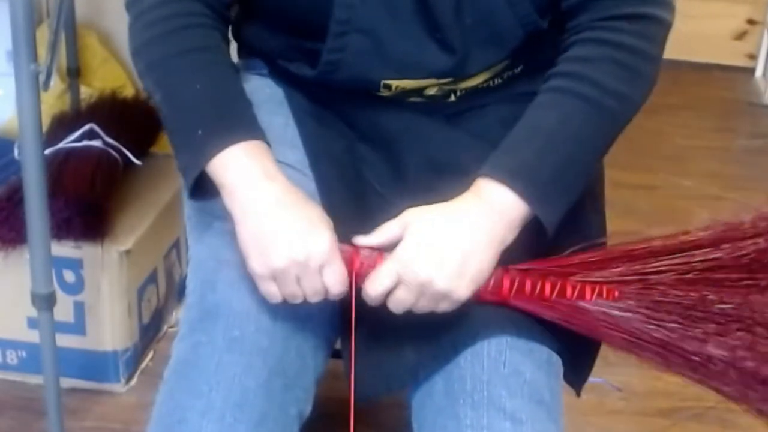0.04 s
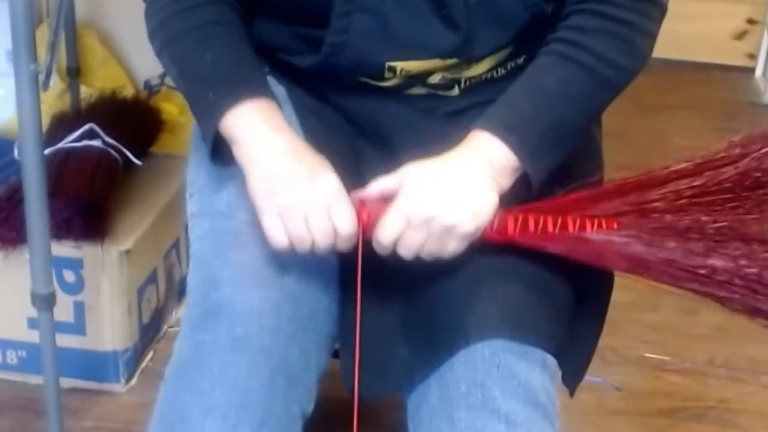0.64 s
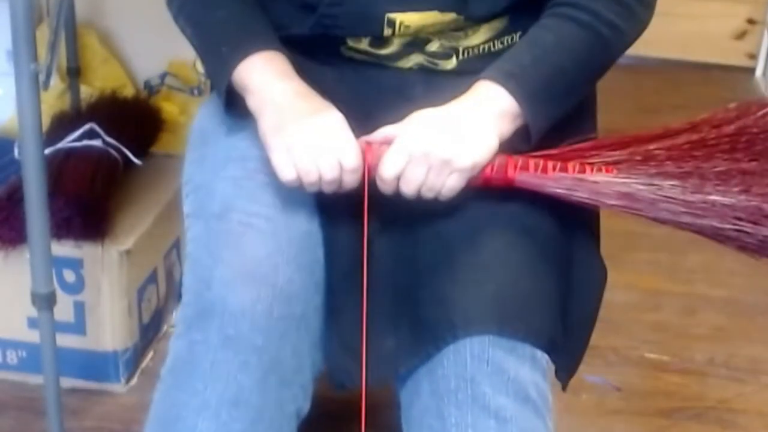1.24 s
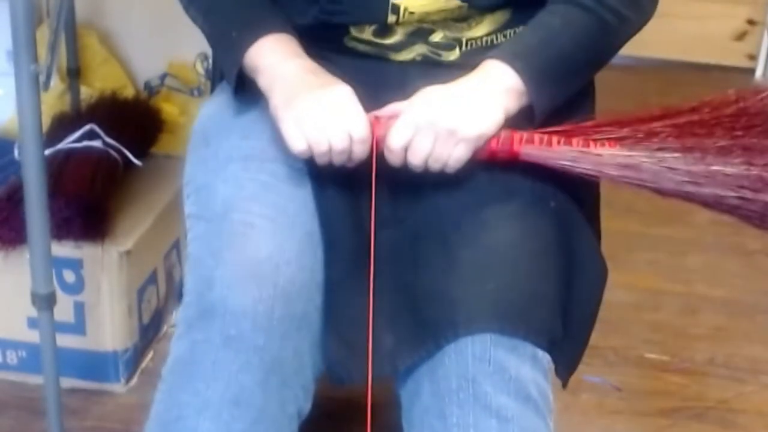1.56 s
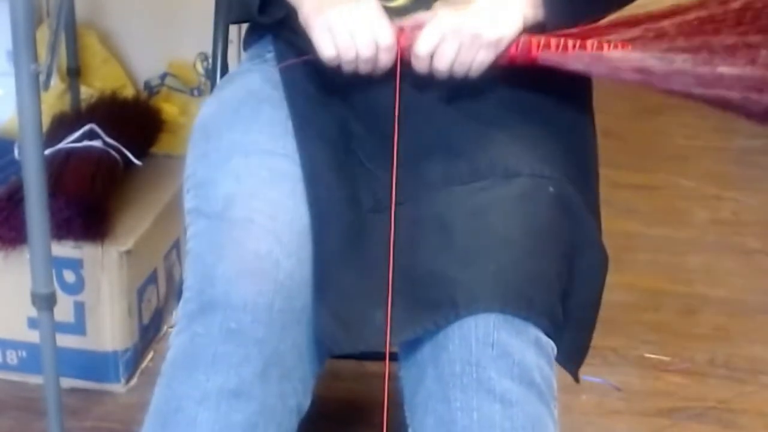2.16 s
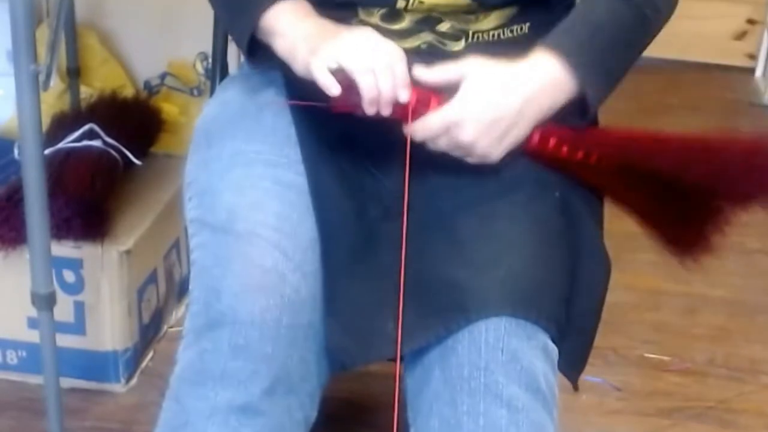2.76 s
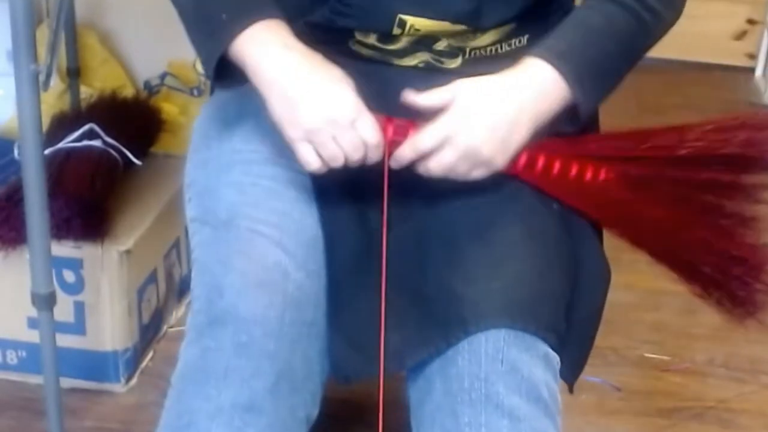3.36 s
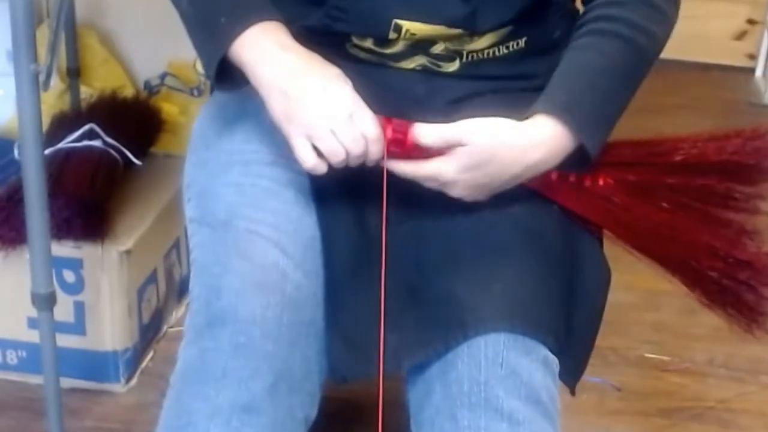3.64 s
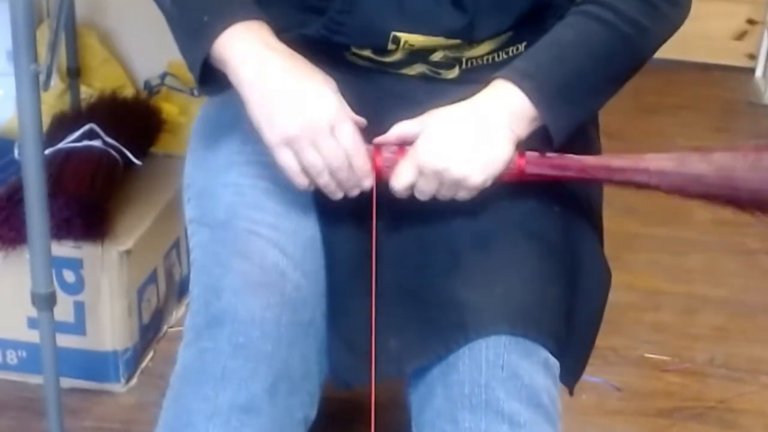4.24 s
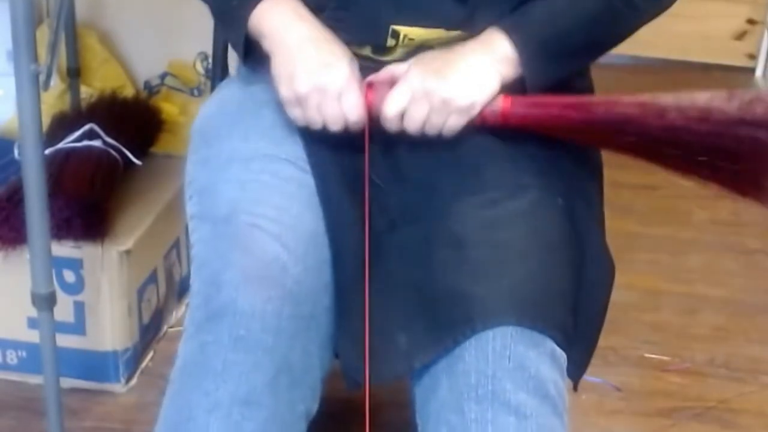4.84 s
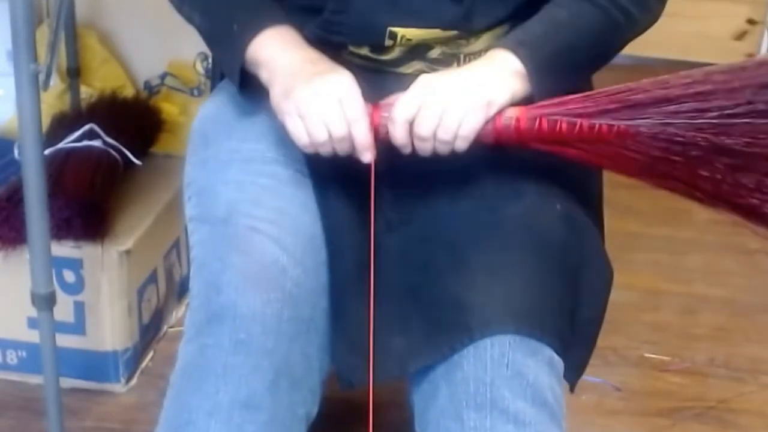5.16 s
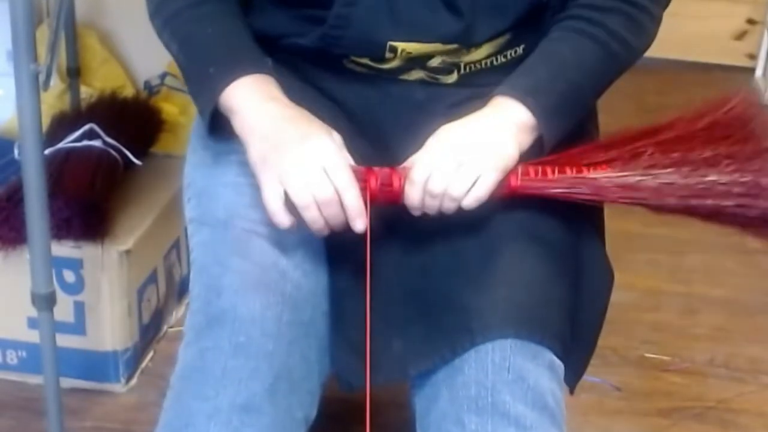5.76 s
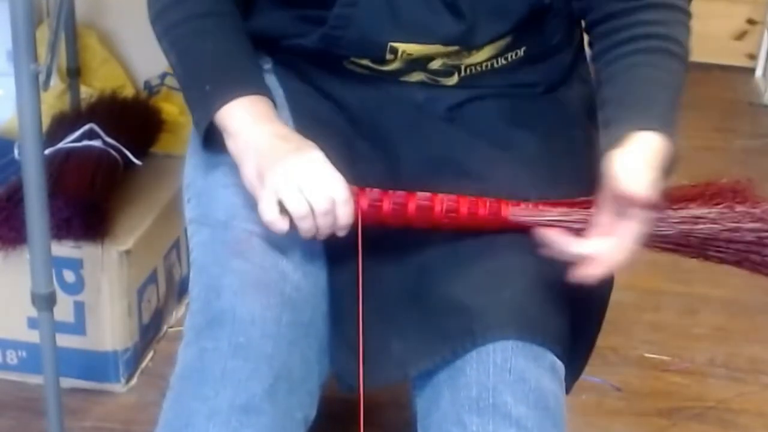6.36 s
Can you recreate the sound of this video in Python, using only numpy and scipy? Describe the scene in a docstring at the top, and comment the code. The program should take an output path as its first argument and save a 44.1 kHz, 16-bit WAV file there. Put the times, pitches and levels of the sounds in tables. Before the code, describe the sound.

Two heavy, distorted wooden thumps on a floor, then faint straw rustling as a broom is wound with string, over a faint hum.

```python
"""Winding a whisk broom

A small workshop, heard from close by on a pair of microphones 10 cm apart. A broom maker winds taut
string round the handle, pulling it off a spool held underfoot. The spool scuffs, creaks and twice tips
hard onto the wooden floor, jolting the string and overloading the input. Then straw rustles in the
hands and feet shift softly on the boards, over a faint hum with a thin whine."""
import sys
import numpy as np
from scipy import signal
from scipy.fft import rfft, irfft, next_fast_len
from scipy.io import wavfile

SR = 44100
rng = np.random.default_rng(int(sys.argv[2]) if len(sys.argv) > 2 else 0)


def store_wav(level_fs):
    """Save 16-bit WAV to argv[1]."""
    pcm = np.round(np.clip(np.atleast_2d(level_fs), -1, 1) * 32767)
    wavfile.write(sys.argv[1], SR, pcm.T.astype(np.int16))


N = 286209
TIME = np.arange(N) / SR

# Resonances of the wooden spool. Each row: frequency in Hz, width in Hz, relative level in dB.
SPOOL_MODES = [(240, 90, -12.5), (375, 110, 1.5), (523, 110, 1), (660, 150, -4.5), (1080, 400, -18),
               (1780, 300, -17), (3400, 350, -32.5), (4950, 1200, -30)]


def undb(db):
    """Decibels to gain."""
    return 10 ** (np.asarray(db) / 20)


def unit(x):
    """Scale to an rms of 1."""
    return x / np.sqrt(np.mean(x ** 2))


def colour(x, points):
    """Filter by a spectrum. Each row of points: frequency in Hz, gain in dB."""
    hz, db = np.transpose(points)
    size = next_fast_len(x.shape[-1], True)
    bin_hz = np.maximum(np.fft.rfftfreq(size, 1 / SR), 1)
    gain = undb(np.interp(np.log(bin_hz), np.log(hz), db))
    return irfft(rfft(x, size) * gain, size)[..., :x.shape[-1]]


def butter(x, hz, kind, order=1):
    """Butterworth low-pass or high-pass."""
    return signal.sosfilt(signal.butter(order, hz, kind, fs=SR, output="sos"), x)


def fade(t, t60):
    """Decay by 60 dB in t60 seconds."""
    return np.exp(-np.log(1000) * t / t60)


def stroke(s, rise_s, hold_s, fall_s):
    """Gain of a movement: up tenfold every rise_s until time s, held, then down tenfold every fall_s."""
    early, late = np.maximum(s - TIME, 0), np.maximum(TIME - s - hold_s, 0)
    return np.exp(-np.log(10) * np.minimum(early / rise_s + late / fall_s, 10))


def add(out, s, x):
    """Mix x in from time s."""
    i = int(s * SR)
    out[..., i:i + x.shape[-1]] += x[..., :N - i]


def pan(left_db):
    """Gains that make the left microphone left_db louder than the right."""
    return undb(np.array([[left_db], [-left_db]]) / 2)


def diffuse(count, mic_gap_m=.1):
    """Noise from all sides at the pair: long waves are alike at both microphones, short ones unrelated."""
    size = next_fast_len(count, True)
    alike = .98 * np.sinc(2 * np.fft.rfftfreq(size, 1 / SR) * mic_gap_m / 343)
    mid, side = (irfft(rfft(rng.standard_normal(size)) * np.sqrt(share / 2), size)[:count]
                 for share in (1 + alike, 1 - alike))
    return np.array([mid + side, mid - side])


def room(x, wet_db, t60):
    """Direct sound plus the workshop's short tail, at about the same power."""
    t = TIME[:SR // 2]
    response = diffuse(len(t)) * fade(t, t60)
    response *= undb(wet_db) / np.sqrt(np.sum(response ** 2) / 2)
    response[:, 0] += 1
    return signal.fftconvolve(x[None], response, axes=1)[:, :N] / np.sqrt(1 + undb(wet_db) ** 2)


def grains(per_s, spread_db):
    """Random tiny clicks, a few much larger than the rest."""
    clicks = (rng.random(N) < per_s / SR) * rng.choice([-1, 1], N)
    return clicks * undb(spread_db * np.minimum(rng.exponential(size=N), 4))


def ring(x, modes):
    """Drive a wooden body whose resonances are damped sines."""
    t = TIME[:SR // 10]
    body = sum((-1) ** k * undb(db) * width * np.exp(-np.pi * width * t) * np.sin(2 * np.pi * hz * t)
               for k, (hz, width, db) in enumerate(modes))
    rung = signal.fftconvolve(np.atleast_2d(x), body[None] / np.linalg.norm(body), axes=1)
    return rung[:, :x.shape[-1]].reshape(x.shape)


def creak(effort, modes, slip_hz, jitter, chatter_db, edge_hz, wet_db):
    """Uneven stick-slip jerks, rounded off above edge_hz, ring a wooden body."""
    gap_spread, size_spread = rng.standard_normal((1200, 2)).T
    slip_times = np.cumsum(np.exp(jitter * gap_spread)) / slip_hz
    slips = np.zeros(N)
    for s, size in zip(slip_times, undb(1.5 * size_spread)):
        if s < TIME[-1]:
            slips[int(s * SR)] += size * np.sqrt(SR / slip_hz)
    slips += undb(chatter_db) * rng.standard_normal(N)
    return room(ring(butter(slips, edge_hz, "low") * effort, modes), wet_db, t60=.22)


def spool_blows(rise_s=.0031, boom_t60=.3, crack_hz=2200, crack_s=.0013, linger_t60=.98):
    """The spool cracks onto the floor: wood rings, the room booms. A softer contact is duller."""
    # Each row: start in seconds, levels of room boom, boards and spool in dB, contact cut-off in Hz.
    blows = [(.746, -24, -14, -34, 1520), (.849, 15, 11, 0.5, 2100), (.92, 0.5, -3, 3, 1278),
             (.985, -10, -6.5, -18.5, 700), (1.462, -28.5, -19.5, -27, 686), (1.517, 11, 4.5, 6.5, 1985),
             (1.585, 1.5, -7, 5.5, 1470), (1.655, -6, -9, -15, 807.7)]
    # Floorboard modes. Each row: frequency in Hz, relative level in dB, 60 dB decay time in seconds.
    board_modes = [(32.6, -8.5, 1), (41.82, -17.5, .7), (58.7, -17, 0.69), (86.9, -6.5, 0.52),
                   (112.5, -0.5, 0.39), (134.5, -6.5, 0.26), (159.83, 1, 0.3), (239.6, -8, 0.27)]
    # The room's boom and the rumble lingering in the floor. Each row: frequency in Hz, gain in dB.
    boom_spectrum = [(25, -18), (70, -7.5), (150, 0.5), (260, -6), (500, -11), (750, -15), (1100, -15.5),
                     (2000, -18.5), (5000, -26.5), (15000, -35)]
    linger_spectrum = [(25, -4.5), (60, -5), (130, 0.5), (220, -5.5), (330, -22.5), (800, -50.5),
                       (15000, -100)]
    out, t = np.zeros((2, N)), TIME[:3 * SR // 2]
    boards = sum(undb(db) * np.sin(2 * np.pi * hz * t + rng.uniform(0, np.pi)) * fade(t, t60)
                 for hz, db, t60 in board_modes)
    crack = undb(-9) * np.sin(2 * np.pi * crack_hz * t) * np.exp(-t / crack_s)
    attack = 1 - np.exp(-t / rise_s)
    for s, boom_db, boards_db, spool_db, contact_hz in blows:
        boom = undb(boom_db) * unit(colour(diffuse(len(t)), boom_spectrum))
        spool = undb(spool_db) * ring(diffuse(len(t)), SPOOL_MODES)
        rumble = undb(boom_db - 25) * unit(colour(diffuse(len(t)), linger_spectrum))
        body = (boom + spool) * fade(t, boom_t60) + rumble * fade(t, linger_t60) + undb(boards_db) * boards
        add(out, s, butter(body * attack + undb(boom_db) * crack, contact_hz, "low", order=2))
    return out


def spool_scuffs(fall_s=.063):
    """The spool drags over grit in dense little catches, with the boards rumbling below."""
    # Each row: peak time in seconds, grit and rumble in dB, rise and slide in seconds, grit cut-off in Hz.
    scuffs = [(.139, -23, -32, 0.013, 0.046, 14200), (.18, -57, -23, 0.049, 0.013, 9000),
              (.75, -38, -55.5, .035, .03, 6895), (1.345, -46.5, -51.5, 0.091, 0.17, 2800),
              (1.434, -35, -38.5, .006, .055, 3226)]
    # Tone of the grit and of the boards. Each row: frequency in Hz, gain in dB.
    grit_spectrum = [(300, -25), (600, -2), (1050, 2), (1500, -4.5), (2100, -2.5), (2500, -7.5),
                     (4300, -13), (6000, -17.5), (8000, -27), (15000, -39.5)]
    rumble_spectrum = [(30, -14), (85, 2), (160, -9.5), (245, 0), (350, -8), (600, -15), (1200, -47)]
    grit = unit(colour(grains(per_s=5500, spread_db=3.5), grit_spectrum))
    rumble = unit(colour(grains(per_s=900, spread_db=5), rumble_spectrum))
    out = np.zeros(N)
    for s, grit_db, rumble_db, rise_s, slide_s, edge_hz in scuffs:
        scrape = undb(grit_db) * butter(grit, edge_hz, "low", order=2) + undb(rumble_db) * rumble
        out += scrape * stroke(s, rise_s, slide_s, fall_s)
    return room(out, wet_db=8.5, t60=.39)


def spool_creak():
    """The turning spool sticks and slips: a low creak from its body, a thin squeal from its axle."""
    # One turn: peak time, rise, hold and fall, all in seconds.
    turn = (.583, .022, .066, .016)
    # Resonances at the axle. Each row: frequency in Hz, width in Hz, relative level in dB.
    axle_modes = [(3260, 210, 0), (4420, 100, 1), (7350, 190, -5.5), (8500, 140, -5), (11200, 450, -6)]
    effort = undb(-24.5) * stroke(*turn)
    body = creak(effort, SPOOL_MODES, slip_hz=72.3, jitter=.081, chatter_db=1, edge_hz=220, wet_db=-3)
    squeal = creak(effort, axle_modes, slip_hz=71.7, jitter=.25, chatter_db=-3.5, edge_hz=9000, wet_db=2)
    return body + undb(-36.5) * squeal


def string_creak():
    """Taut string slips round the handle in ragged jerks."""
    # Each row: peak time in seconds, level in dB, then rise, hold and fall in seconds.
    pulls = [(4.688, -55, 0.22, 0.029, .11), (4.932, -63, 0.031, 0.065, 0.069)]
    # Resonances of the handle. Each row: frequency in Hz, width in Hz, relative level in dB.
    handle_modes = [(668, 71, 5.5), (870, 140, -3), (1380, 280, 0), (2000, 170, -1)]
    effort = sum(undb(db) * stroke(s, rise_s, hold_s, fall_s) for s, db, rise_s, hold_s, fall_s in pulls)
    return creak(effort, handle_modes, slip_hz=162, jitter=1, chatter_db=-16, edge_hz=4400, wet_db=15)


def string_twangs(t60=1.55):
    """The jolted string swings in two planes at slightly different pitches, which beat."""
    # Each row: start in seconds, level in dB.
    jolts = [(0.864, -27.5), (1.527, -25.5)]
    # Pitches of the weaker and the stronger plane in Hz.
    plane_hz = [193, 190.3]
    out, t = np.zeros(N), TIME[:3 * SR]
    weak, strong = (np.sin(2 * np.pi * hz * t) for hz in plane_hz)
    tone = (strong + undb(-2) * weak) * fade(t, t60)
    for s, db in jolts:
        out[int(s * SR):] = 0  # a new jolt replaces the old swing
        add(out, s, undb(db) * tone)
    return out


def straw_rustle(fits_per_s=45, snap_s=.0048):
    """With each grip the stalks rub and tick in fits and starts; some snap under the string."""
    # Hands squeezing the straw. Each row: peak time in seconds, level in dB, rise and fall in seconds.
    grips = [(1.999, -68, .25, 0.28), (2.268, -54.5, .11, 0.074), (2.365, -63.5, .03, .2),
             (2.54, -63, 0.045, .35), (2.66, -52.5, 0.056, .33), (2.775, -56, 0.013, .08),
             (2.86, -43, 0.031, 0.048), (2.95, -52.5, .012, 0.041), (3.165, -63.5, .04, .08),
             (3.243, -62, .015, .08), (3.89, -64.5, .05, 0.069), (4.035, -50.5, .05, 0.1),
             (4.215, -62, .012, .05), (4.63, -56, 0.23, 0.53), (4.98, -62.5, 0.16, 0.11),
             (5.262, -50.5, 0.084, 0.048), (5.52, -48, .26, 0.15), (5.631, -50.5, .012, 0.095),
             (5.84, -64, .015, .18), (6.08, -67, .015, .25), (6.345, -70, 0.037, .2)]
    # The loudest stalks. Each row: start in seconds, level in dB.
    snaps = [(0.493, -44.5), (1.8707, -45.5), (2.359, -46), (2.7664, -36.5), (2.8476, -35), (2.8694, -34.5),
             (2.9463, -48.5), (4.0896, -43), (4.5965, -45), (4.98, -58), (5.024, -45), (5.1934, -43.5),
             (5.425, -41.5), (5.6246, -39)]
    # Tone of the straw. Each row: frequency in Hz, gain in dB.
    spectrum = [(250, -8.5), (600, -15), (1300, -11), (1640, -16.5), (2100, -7), (2800, -7.5), (5300, -2.5),
                (7100, -5), (8700, -20), (11000, -19.5), (15000, -24)]
    rub = undb(-4.5) * unit(colour(grains(per_s=1700, spread_db=3.5), spectrum))
    fits = undb(1.5 * np.interp(TIME * fits_per_s, np.arange(1000), rng.standard_normal(1000)))
    ticks = undb(-2) * unit(colour(stalk_ticks(), spectrum))
    power = sum((undb(db) * stroke(s, rise_s, .005, fall_s)) ** 2 for s, db, rise_s, fall_s in grips)
    out = (rub + ticks) * fits * np.sqrt(power)
    t = TIME[:SR // 40]
    for s, db in snaps:
        snap = colour(rng.standard_normal(len(t)), spectrum) * np.exp(-t / snap_s)
        add(out, s, snap / np.abs(snap).max() * undb(db + .5))
    return room(out, wet_db=.5, t60=.1) * pan(left_db=-3)


def stalk_ticks(per_s=700, ring_s=.0016, spread_db=3):
    """Each stalk that slips ticks at a pitch of its own."""
    out, t = np.zeros(N), TIME[:SR // 60]
    for when, pitch, chance in rng.random((int(per_s * N / SR), 3)):
        hz = 500 + pitch * 11000
        gain = undb(-spread_db * np.log(max(chance, .03)))
        add(out, when * TIME[-1], gain * np.sin(2 * np.pi * hz * t) * np.exp(-t / ring_s))
    return out


def foot_thuds(sag=.092, ring_cycles=32, room_t60=.26):
    """A rocking foot slowly pushes a board, which swings and sags in pitch; the room answers."""
    # Each row: start in seconds, level in dB, settled pitch in Hz, rise in seconds, room share in dB.
    thuds = [(0.47, -44.5, 120.4, 0.062, 0.5), (1.938, -26.5, 131.8, 0.073, -7),
             (2.59, -51.5, 150, 0.044, 5.5), (2.952, -36.5, 122.6, 0.022, 2.5),
             (3.101, -46, 42.1, 0.055, -12), (4.269, -51.5, 134.6, 0.026, 0.5),
             (4.3, -49, 38.3, 0.049, -23), (4.599, -51, 111.2, 0.027, -0.5), (4.741, -48, 185, 0.019, -2),
             (4.842, -38, 87, 0.036, 5.5), (4.899, -56, 237, 0.072, 8)]
    # The room's dull answer. Each row: frequency in Hz, gain in dB.
    echo_spectrum = [(25, 3.5), (90, 2), (160, -6), (300, -16.5), (600, -27.5), (1200, -32.5), (4000, -56),
                     (15000, -91.5)]
    out, t = np.zeros((2, N)), TIME[:SR]
    for s, db, hz, rise_s, room_db in thuds:
        push = np.sin(np.pi / 2 * np.minimum(t / rise_s, 1)) ** 2
        since_push = np.maximum(t - rise_s, 0)
        pitch_hz = hz * (1 + sag * np.exp(-t / rise_s))
        board = np.sin(2 * np.pi * np.cumsum(pitch_hz) / SR) * fade(since_push, ring_cycles / hz)
        echo = undb(room_db) * unit(colour(diffuse(len(t)), echo_spectrum)) * fade(since_push, room_t60)
        add(out, s, undb(db) * push * (board + echo))
    return out


def room_tone(whine_hz=1144, waver_hz=1.5, steady_db=-71.5, air_db=-67):
    """Air all round, a faint hum in the middle and a thin, wavering whine to the left."""
    # Swells of the whine. Each row: peak time in seconds, level in dB, rise and fall in seconds.
    swells = [(1.25, -69, 1.28, .6), (2.12, -62, .5, 0.59), (3.3, -72, .4, 0.54)]
    # Each row: frequency in Hz, rms level in dB.
    hum_tones = [(538, -83), (807, -89.5), (1079, -88), (1561, -88)]
    # Each row: frequency in Hz, gain in dB.
    air_spectrum = [(25, 0), (60, -3.5), (150, -13), (380, -10.5), (700, -15.5), (1500, -20.5),
                    (3000, -24.5), (7000, -33), (9000, -41.5), (15000, -50)]
    drift = np.interp(TIME, np.linspace(0, TIME[-1], 40), rng.standard_normal(40))
    swelling = sum(undb(db) * stroke(s, rise_s, 0, fall_s) for s, db, rise_s, fall_s in swells)
    whine = np.sin(2 * np.pi * np.cumsum(whine_hz + waver_hz * drift) / SR) * (undb(steady_db) + swelling)
    hum = sum(undb(db) * np.sin(2 * np.pi * hz * TIME) for hz, db in hum_tones)
    air = undb(air_db) * unit(colour(diffuse(N), air_spectrum))
    return np.sqrt(2) * (hum + whine * pan(left_db=4)) + air


def scene():
    """Spool and feet on the floor, string and straw in the hands, and the quiet workshop."""
    creaks = spool_creak() + string_creak()
    floor = spool_blows() + foot_thuds() + spool_scuffs()
    return floor + creaks + string_twangs() + straw_rustle() + room_tone()


def record(dry, ceiling=.62, droop_hz=52, spit_s=.00048, top_hz=15800):
    """The input clips: each swing into overload spits; flat tops sizzle and droop through its coupling."""
    # Tone of the overload crackle. Each row: frequency in Hz, gain in dB.
    crackle_spectrum = [(1200, -29.5), (3000, -3), (5500, -1.5), (8000, -2.5), (15000, -7)]
    overload = np.clip(np.abs(dry) / ceiling - 1, 0, 1)
    entry = np.maximum(np.diff(overload, prepend=0), 0)
    spit = np.minimum(signal.lfilter([1], [1, -np.exp(-1 / (spit_s * SR))], entry), 1)
    flicker = undb(6 * np.repeat(rng.standard_normal(N // 100 + 1), 100)[:N])
    hiss = colour(rng.standard_normal((2, N)), crackle_spectrum)
    crackle = (undb(-26) * overload + undb(-7.5) * spit * flicker) * hiss
    clipped = butter(np.clip(dry, -ceiling, ceiling), droop_hz, "high")
    treble_cut = signal.ellip(8, .2, 70, top_hz, fs=SR, output="sos")
    return signal.sosfilt(treble_cut, np.clip(clipped + crackle, -1, 1))


dry = scene()
out = record(dry)
store_wav(out)
```